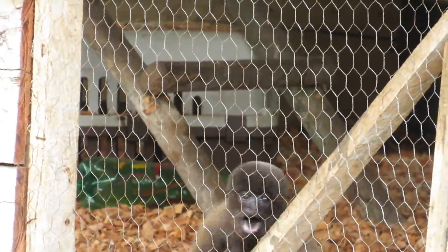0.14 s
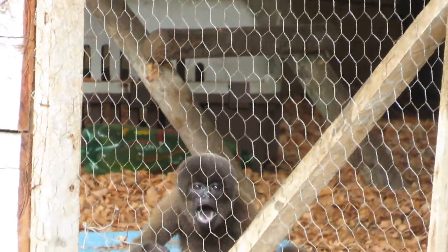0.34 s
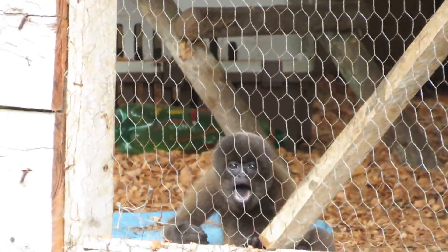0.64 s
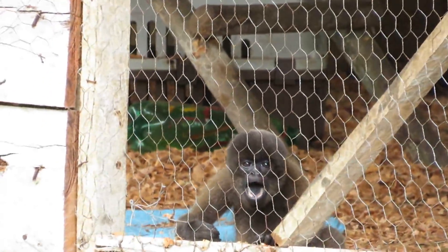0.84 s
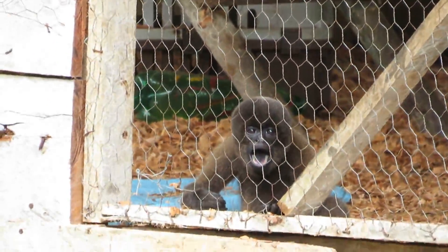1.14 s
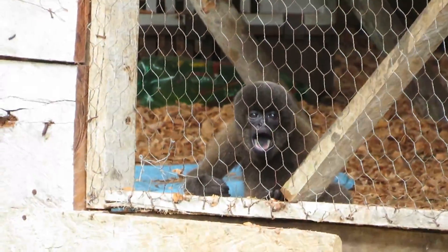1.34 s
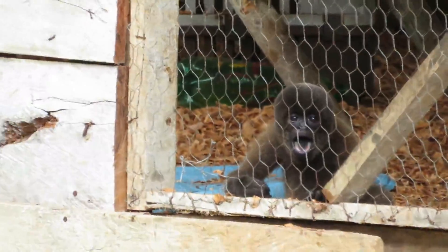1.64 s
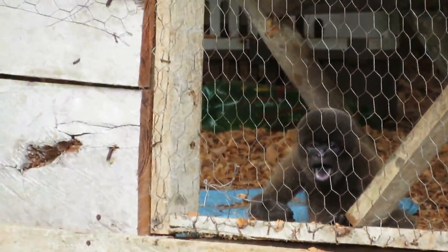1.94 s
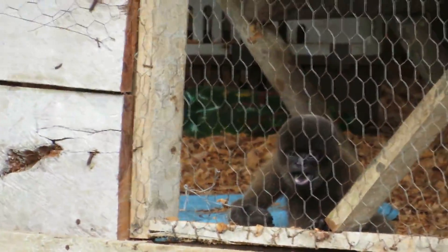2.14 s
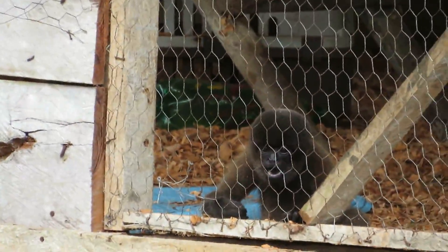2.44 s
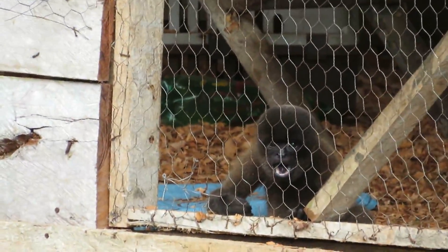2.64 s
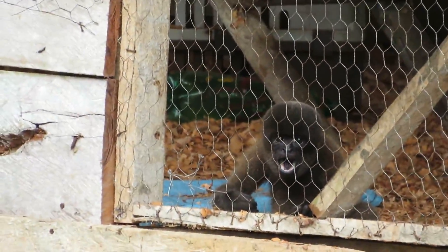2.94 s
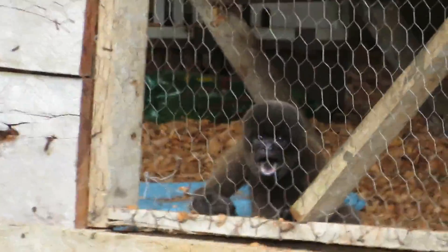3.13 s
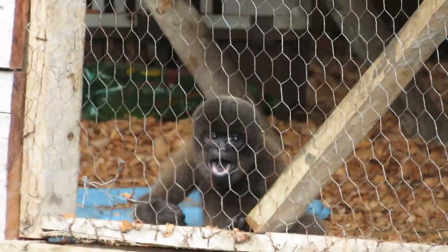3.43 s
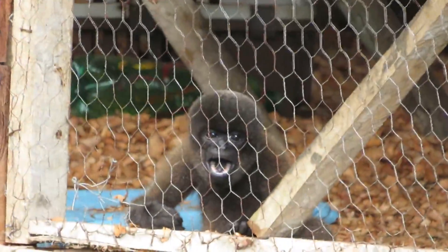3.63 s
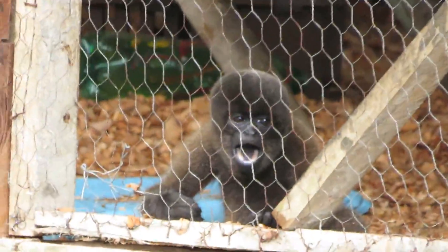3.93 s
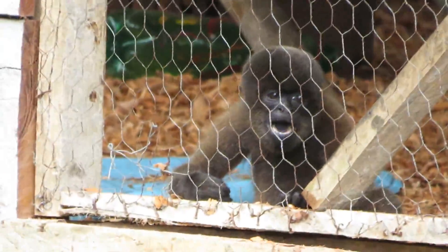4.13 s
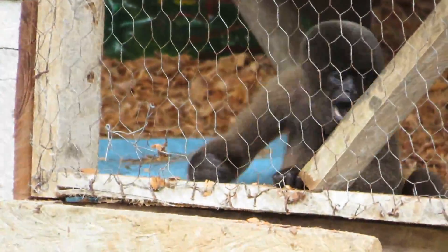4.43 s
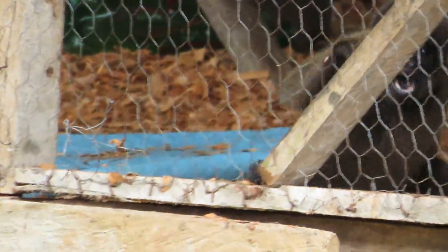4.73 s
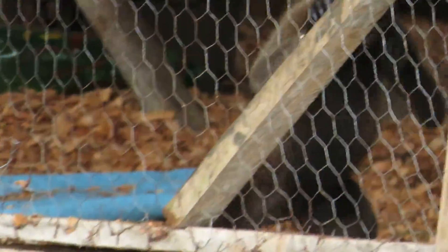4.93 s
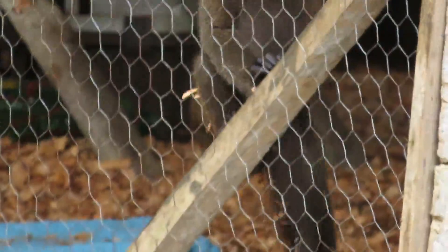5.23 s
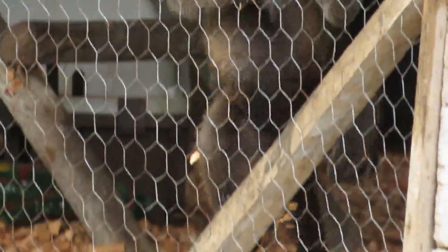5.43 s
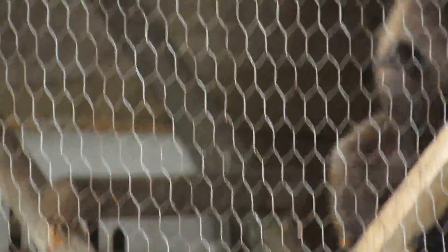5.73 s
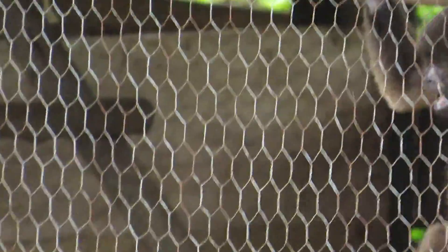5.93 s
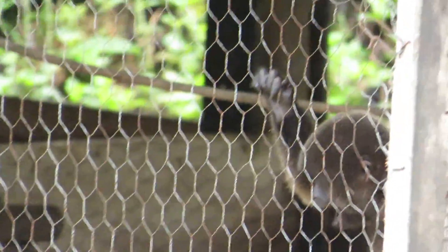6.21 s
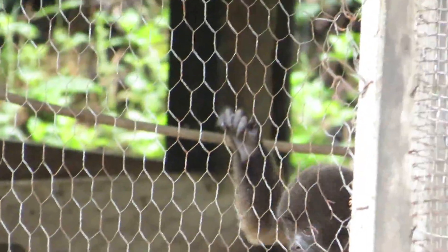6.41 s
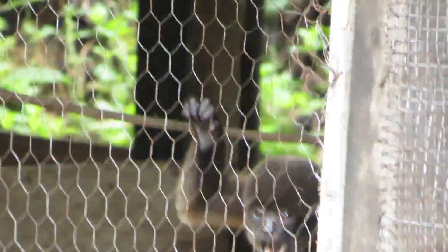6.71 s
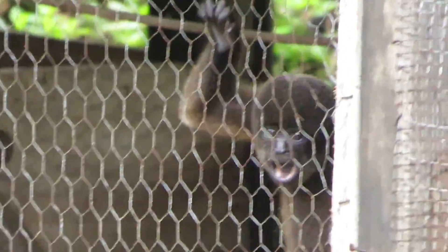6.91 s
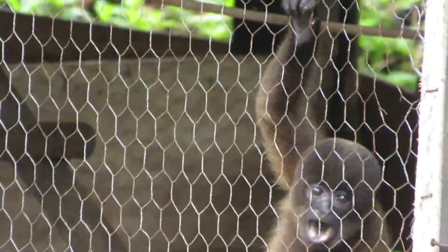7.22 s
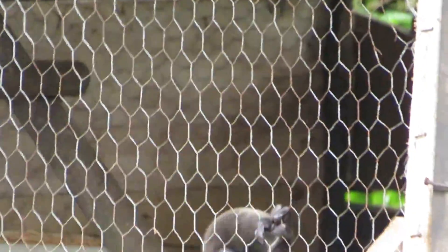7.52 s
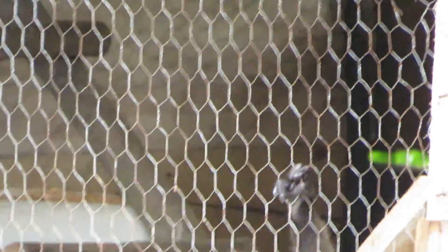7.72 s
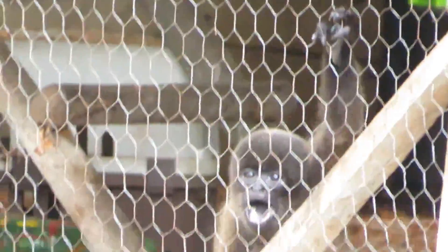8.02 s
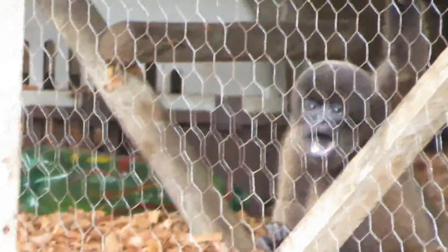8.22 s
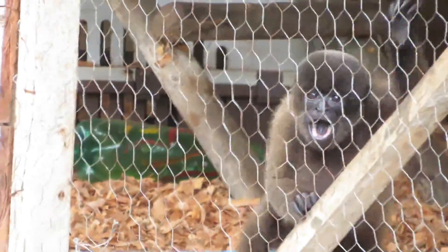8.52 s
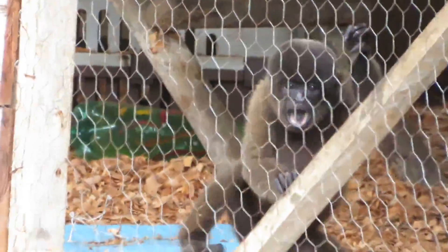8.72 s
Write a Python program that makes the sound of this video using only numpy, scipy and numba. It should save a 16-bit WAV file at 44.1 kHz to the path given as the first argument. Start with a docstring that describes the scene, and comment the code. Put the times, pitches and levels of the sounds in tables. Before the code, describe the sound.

Outdoors, a few metres from a wooden pen, a young monkey shrieks repeatedly in a high, raspy voice. The shrieks give way to brief barks and whistling chirps, then return, growing harsher toward the end. The calls echo lightly off the walls, with an occasional soft knock on wood. The background is very quiet: a murmur of air, far-off motor hum, insects and slight wind rumble on the microphone.

```python
"""Young monkey in a pen

Outdoors, a few metres from a wood and wire pen. The monkey's slack vocal folds clap out short throaty
barks, then tighten and flip up into a thin whistle; in the long screams the whistle breaks to half its
pitch and turns to rasp. The pen walls echo the calls and a few wooden knocks. Behind them are a murmur
of air, a distant motor and insects, with wind on the microphone."""
import sys
import numpy as np
from scipy import signal
from scipy.io import wavfile
from scipy.ndimage import uniform_filter1d
from numba import njit

SR = 44100
rng = np.random.default_rng(int(sys.argv[2]) if len(sys.argv) > 2 else 0)


def log_audio(samples):
    """Write samples as a 16-bit WAV file to the path given in sys.argv[1]."""
    # one column per channel
    frames = np.atleast_2d(samples).T
    # limit to full scale, then quantise
    limited = np.clip(frames, -1, 1)
    pcm = np.round(limited * 32767).astype(np.int16)
    wavfile.write(sys.argv[1], SR, pcm)


N = 390726
T = np.arange(N) / SR


def undb(db):
    return 10 ** (np.asarray(db) / 20)


def unit(x):
    return x / np.sqrt(np.mean(x ** 2))


def decay(t, t60):
    return np.exp(-np.log(1000) * t / t60)


def curves(rows):
    """Columns of a timed table as curves over the whole scene."""
    times, *columns = np.transpose(rows)
    return [np.interp(T, times, column) for column in columns]


@njit
def bandpass(x, hz, width_hz):
    """State-variable band-pass with a moving centre, gain 1 at the centre."""
    y, band_state, low_state = np.empty(len(x)), 0., 0.
    for i in range(len(x)):
        g, damping = np.tan(np.pi * hz[i] / SR), width_hz / hz[i]
        v = (band_state + g * (x[i] - low_state)) / (1 + g * (g + damping))
        band_state, low_state = 2 * v - band_state, low_state + 2 * g * v
        y[i] = damping * v
    return y


def band(x, hz, width_hz):
    """A steep resonance: the band-pass twice."""
    hz, width_hz = hz + np.zeros(len(x)), float(width_hz)
    return bandpass(bandpass(x, hz, width_hz), hz, width_hz)


def noise_band(hz, width_hz, size=N):
    return band(rng.standard_normal(size), hz, width_hz)


@njit
def uneven_cycles(hz, period_scale):
    """Phase in turns; every cycle has its own length."""
    turns, position = np.empty(len(hz)), 0.
    for i in range(len(hz)):
        position += hz[i] / period_scale[int(position)] / SR
        turns[i] = position
    return turns


def wander(rate, size=N):
    """Random levels held 1 / rate s and smoothed twice; spread near 1."""
    hold = int(SR / rate)
    steps = np.repeat(rng.standard_normal(size // hold + 1), hold)
    return 1.31 * uniform_filter1d(uniform_filter1d(steps, hold), hold)[:size]


def call_span(start, end, fade_s):
    """Sample range, time since the start and edge fade of one call."""
    span = slice(int(start * SR), min(int(end * SR), N))
    t = T[span] - start
    return span, t, np.clip(np.minimum(t, end - start - t) / fade_s, 0, 1)


# Colour of the open air. Each row: frequency in Hz, relative level per Hz in dB.
AIR_SPECTRUM = [(15, -34), (25, -9.5), (158, -3.5), (621, -11.5), (749, -20.5), (1000, -14), (2430, -18),
                (8100, -27.5), (11500, -40), (15000, -58)]
# Its slow swell. Each row: time in seconds, level around 600 Hz in dB.
AIR_SWELL = [(0, -58), (3.3, -58), (4.0, -60), (4.4, -58.5), (8.86, -57.5)]


def air():
    """Distant air all round: third-octave noise bands flicker separately, the bass near the centre."""
    out = np.zeros((2, N))
    spectrum_hz, spectrum_db = np.transpose(AIR_SPECTRUM)
    for hz in 30 * 2 ** np.arange(0, 9.1, 1 / 3):
        mid, side = (noise_band(hz, hz / 2.92) for _ in range(2))
        db = np.interp(np.log(hz), np.log(spectrum_hz), spectrum_db) + 1.34 * wander(3.14)
        spread = min(hz / 320, .8) * np.array([[1], [-1]])
        out += undb(db) * (mid + spread * side)
    midrange_rms = np.std(band(out.mean(axis=0), 632, 965))
    return out / midrange_rms * undb(curves(AIR_SWELL)[0])


# The motor's hum and its drone. Each row of both: time in seconds, level in dB.
HUM_LEVELS = [(0, -62), (1, -56), (2.5, -64.5), (5.6, -56.5), (8.86, -55)]
DRONE_LEVELS = [(0, -57), (3.2, -60), (3.5, -65.5), (4.2, -63.5), (4.4, -57), (8.0, -56), (8.3, -65)]


def motor(hum_hz=163, drone_hz=785):
    """A motor far from the microphone: a wavering tone, its octave and a breathy drone."""
    phase = 2 * np.pi * np.cumsum(hum_hz * (1 + 0.0202 * wander(7.3))) / SR
    hum = np.sin(phase) + undb(-4.5) * np.sin(2 * phase)
    drone = undb(curves(DRONE_LEVELS)[0] + wander(1.835)) * unit(noise_band(drone_hz, 174))
    return undb(curves(HUM_LEVELS)[0] + 2.86 * wander(25)) * hum + drone


# The insect chorus. Each row: centre in Hz, width in Hz, level in dB.
INSECT_BANDS = [(6700, 220, -73.5), (8300, 1400, -74)]


def insects():
    """Insects on both sides of the microphone: narrow, gently wavering bands of treble hiss."""
    out = np.zeros((2, N))
    for hz, width_hz, db in INSECT_BANDS:
        level = undb(db + 2 * wander(6.7))
        out += level * np.array([unit(noise_band(hz, width_hz)) for _ in range(2)])
    return out


# Gusts at the microphone. Each row: time in seconds, level in dB.
GUSTS = [(0, -64), (.25, -47.5), (.6, -62.5), (5.3, -59), (5.6, -58), (6.2, -59), (6.85, -57), (7.1, -58)]


def wind():
    """Wind right on the microphone: a low rumble."""
    return undb(curves(GUSTS)[0]) * unit(noise_band(50, 100))


# Barks from the pen. Each row: start in seconds, rough peak level in dB, low and middle throat
# resonances in Hz, top resonance relative to those two in dB, length in seconds.
THROAT_BARKS = [(0.132, -18.5, 1890, 2640, -5.5, 0.021), (0.938, -12, 2130, 2740, -9.5, 0.029),
                (1.747, -13, 2180, 2510, -4.5, 0.056), (2.676, -19.5, 1950, 2800, -6, 0.023),
                (3.1, -19, 2020, 2980, -9.5, 0.027), (3.7248, -21.5, 2030, 2910, -9, 0.024),
                (3.872, -22, 2416, 2452, -1, 0.023), (4.383, -18, 1830, 2710, -16, 0.029),
                (4.5266, -16, 1920, 2520, -3.5, 0.025), (4.9468, -18.5, 1690, 2780, -7.5, 0.034),
                (5.227, -13, 1800, 2640, -8, 0.025), (5.5743, -21.5, 1750, 2690, -18, 0.019),
                (5.9142, -16, 1620, 2660, -18, 0.03), (6.709, -25.5, 2080, 2670, -3, 0.043),
                (6.883, -17, 1796, 2560, -13, 0.03), (7.1993, -14, 1970, 2690, -6.5, 0.029),
                (8.0744, -13, 2010, 2680, -5, 0.038), (8.614, -16, 2140, 2717, -9.5, 0.015)]


def barks(clap_hz=430, clap_rise_hz=680, crest_db=13.5):
    """A few metres off, slack folds clap unevenly, faster and faster, into three throat resonances."""
    out = np.zeros(N)
    for start, peak_db, low_hz, mid_hz, top_db, length in THROAT_BARKS:
        progress = np.arange(int((length + 0.0025) * SR)) / (length * SR)
        jitter, shimmer = rng.standard_normal((60, 2)).T
        turns = uneven_cycles(clap_hz + clap_rise_hz * progress, np.exp(.12 * jitter))
        claps = np.diff(np.floor(turns), prepend=-1) * undb(2.4 * shimmer)[turns.astype(int)]
        breath = 0.039 * rng.standard_normal(len(progress))
        arch = (progress < 1) * (0.86 + 0.66 * np.sin(3.28 * progress))
        soft = band(band((claps + breath) * arch, 1500, 7300), 1500, 7300)  # flesh has no sharp edge
        throat = unit(band(soft, low_hz, 570) - band(soft, mid_hz, 530))
        throat += undb(top_db) * unit(band(soft, 3480, 1500))
        first = int(start * SR)
        out[first:first + len(throat)] += undb(peak_db - crest_db) * unit(throat)
    return out


# Clean whistles from the pen. Each row: start and length in seconds, entry, held and exit pitch in Hz,
# on-pitch level at the start and at the end in dB.
THIN_WHISTLES = [ (0.141, .075, 4300, 5720, 5700, -39.5, -44), (0.22, 0.04, 5690, 5650, 6050, -45.5, -28),
                 (0.742, 0.024, 5820, 5800, 4970, -44, -20.5),
                 (1.011, 0.055, 5450, 5500, 5650, -37.5, -29.5),
                 (1.156, 0.07, 5980, 5834, 5797, -30.5, -17), (1.781, 0.0997, 4000, 5060, 5380, -27.5, -21),
                 (2.693, 0.012, 2740, 3100, 3120, -23, -41), (3.115, 0.018, 2960, 4220, 4340, -32, -33.5),
                 (3.319, 0.091, 5660, 5750, 4790, -24.5, -25.5), (3.895, 0.014, 4870, 5150, 5230, -37, -23),
                 (3.967, 0.02, 5440, 5500, 5090, -41, -30), (4.535, 0.022, 3390, 4930, 4890, -38, -26),
                 (4.626, 0.031, 3680, 3618, 3560, -44, -23.5), (4.659, 0.037, 3820, 5340, 4970, -22, -34.5),
                 (4.963, 0.02, 3550, 4480, 4300, -32, -39.5), (5.25, .015, 4240, 4270, 4314, -24.5, -27.5),
                 (6.025, 0.13, 2105, 5420, 5570, -37, -40.5), (6.44, 0.021, 5880, 5800, 4490, -25, -20.5),
                 (6.717, 0.033, 1454, 4220, 4215, -11.5, -37.5),
                 (6.903, .022, 4170, 5100, 5170, -36.5, -34),
                 (7.017, 0.049, 4280, 3540, 3540, -39.5, -30.5), (7.231, 0.02, 4550, 5060, 4960, -22, -41),
                 (7.281, 0.043, 5200, 5115, 4430, -38.5, -31), (7.318, 0.032, 4440, 4450, 4300, -35, -28),
                 (7.355, .055, 4770, 5270, 5680, -25, -36), (7.558, .05, 6050, 5900, 6000, -33, -47),
                 (7.901, .022, 4170, 3980, 3780, -32, -22.5), (8.088, 0.056, 2825, 4570, 4460, -26, -22),
                 (8.127, 0.012, 1700, 1560, 1530, -25, -24.5), (8.153, 0.033, 4440, 4380, 4590, -35, -27),
                 (8.612, 0.042, 1904, 4200, 4300, -21.5, -33),
                 (8.683, 0.03, 3670, 3200, 3170, -27.5, -23.5)]
RISE_HZ_PER_S, FALL_HZ_PER_S, DROP_HZ_PER_S = 85000, 40000, 65000  # folds tighten, slacken, let go
OFF_PITCH_DB_PER_OCTAVE = -16.5  # weaker while gliding to or from the held pitch


def whistles():
    """Taut folds swing as a near sine with a faint octave; they glide in, hold, then creep up or drop."""
    out = np.zeros(N)
    for start, length, entry_hz, held_hz, exit_hz, start_db, end_db in THIN_WHISTLES:
        span, t, fade = call_span(start, start + length, fade_s=0.0018)
        glide = np.clip(held_hz, entry_hz - FALL_HZ_PER_S * t, entry_hz + RISE_HZ_PER_S * t)
        glide -= np.maximum(held_hz - exit_hz - DROP_HZ_PER_S * (length - t), 0)
        creep = max(exit_hz - held_hz, 0) * t / length
        hz = uniform_filter1d(glide + creep, SR // 120, mode="nearest")  # folds cannot turn a corner
        phase = 2 * np.pi * np.cumsum(hz * (1 + 0.0059 * wander(268, len(t)))) / SR
        tone = np.sqrt(2) * (np.sin(phase) + undb(-33.5) * np.sin(2 * phase))
        db = start_db + (end_db - start_db) * t / length
        db += OFF_PITCH_DB_PER_OCTAVE * np.abs(np.log2(glide / held_hz))
        out[span] += tone * undb(db + 2.8 * wander(140, len(t))) * fade
    return out


def rasp(hz, throat_hz, throat_db, mouth_hz=2840):
    """Folds stumble in cycle length and size; their puffs ring in low, upper, treble and top bands."""
    n = len(hz)
    jitter, shimmer = rng.standard_normal((n // 4 + 9, 2)).T
    turns = uneven_cycles(hz, np.exp(.42 * jitter))
    strength = undb(1.9 * shimmer)[turns.astype(int)] * undb(1.2 * wander(202, n))
    puffs = strength * np.exp(4 * np.cos(2 * np.pi * turns))
    throat = band(puffs, throat_hz * (1 + 0.035 * wander(26.2, n)), 530)  # the throat keeps shifting
    low = undb(throat_db) * unit(throat) + unit(band(band(puffs, hz, 1770), 1.005 * hz, 1660))
    mouth = mouth_hz + 0.68 * (hz - mouth_hz)  # the mouth follows the pitch only in part
    upper = undb(-5.5) * unit(band(band(puffs, 1.713 * mouth, 910), 1.64 * mouth, 910))
    upper += unit(band(band(puffs, 1.806 * mouth, 1080), 2.041 * mouth, 1100))
    treble = unit(band(puffs, 2.91 * hz, 4200))
    treble += undb(-11.5) * unit(band(band(puffs, 3.6 * hz, 3500), 4.1 * hz, 3500))
    top = band(band(puffs, 13500, 3000), 14000, 3000)
    return unit(low), unit(upper), treble, unit(top)


# Screams from the pen, one list each. Each row: time in seconds, half pitch in Hz, low band level in dB.
SCREAM_CONTOURS = [
    [(.263, 2950, -30.5), (.4, 2984, -26), (.55, 3060, -24.5), (.63, 2968, -22), (.7, 2862, -24),
     (.745, 2900, -21.5), (.775, 2470, -42)],
    [(.965, 2505, -22), (.985, 2818, -17.5), (1.015, 2770, -26), (1.072, 2763, -20), (1.1, 2927, -25.5),
     (1.16, 2934, -23.5), (1.23, 2920, -24), (1.4, 2999, -24.5), (1.47, 2853, -24), (1.53, 2455, -25),
     (1.59, 2328, -42)],
    [(1.88, 2498, -22.5), (1.97, 2896, -24.5), (2.0, 2725, -24.5), (2.04, 2746, -23.5), (2.08, 2656, -26),
     (2.11, 2240, -33), (2.15, 2008, -41.5)],
    [(6.145, 2800, -29.5), (6.2, 2810, -26.5), (6.35, 2837, -26), (6.44, 2966, -29)],
    [(7.343, 2215, -36), (7.355, 2526, -19.5), (7.37, 2440, -53), (7.405, 2360, -38), (7.412, 2924, -22),
     (7.555, 2988, -25), (7.595, 2970, -29), (7.61, 3004, -20.5), (7.7, 2788, -19.5), (7.78, 2730, -18),
     (7.82, 2542, -16.5), (7.9, 2162, -22.5)],
    [(8.175, 2617, -29), (8.275, 2570, -31.5), (8.285, 2807, -19.5), (8.36, 3094, -24), (8.42, 2707, -22),
     (8.462, 2810, -28)],
    [(8.716, 2656, -21.5), (8.76, 3100, -30.5), (8.81, 3323, -31), (8.86, 3420, -24)],
]
# Their steady stretches. Each row: start and end in seconds, upper band over the low one at the start
# and at the end in dB, throat resonance in Hz, its gain in dB, treble gain at full effort in dB.
SCREAM_STRETCHES = [ (0.262, 0.71, 0, 0.5, 2480, 5, -18.5), (.705, 0.773, -8, 6, 2400, -1, -24),
                    (0.961, 1.01, -12, -15, 2184, 2, -10.5), (1.072, 1.162, -3.5, -3.5, 2530, -5, -23),
                    (1.229, 1.53, 0.5, 0, 2496, 4, -23), (1.53, 1.593, 3.5, 13.5, 2100, -13, -24),
                    (1.88, 2.105, -2, 3.5, 2570, 6, -23.5), (2.107, 2.149, 8, 17, 1900, -24, -16),
                    (6.146, 6.443, -7.5, -3.5, 2680, 10, -25), (7.341, 7.411, -25, -16, 1940, -22, -34),
                    (7.414, 7.558, -4, -5, 2720, 6, -21.5), (7.551, 7.608, -1, -1.5, 2320, -16, -16),
                    (7.606, 7.901, -8.5, -6, 2600, 2.5, -17.5), (8.174, 8.281, -16, -16, 2190, -0.5, -10),
                    (8.283, 8.455, -32, -31.5, 2130, -3.5, -6), (8.714, 8.866, -29, -32, 2040, -6, -8)]
# One value a stretch: the share that is rasp rather than clean tone, from 0 to 1.
RASP_SHARES = [.85, .45, .08, .22, .44, .12, .22, .7, .76, .15, .38, .12, .48, .97, .9, .92]


def screams():
    """Every second swing of the folds is weak, so a tone sounds at half pitch, mixed with rasp."""
    out = np.zeros(N)
    pitch_hz, level_db = curves(np.concatenate(SCREAM_CONTOURS))
    for stretch, rasp_share in zip(SCREAM_STRETCHES, RASP_SHARES):
        start, end, start_db, end_db, throat_hz, throat_db, treble_db = stretch
        span, t, fade = call_span(start, end, fade_s=0.00083)
        hz = uniform_filter1d(pitch_hz[span], SR // 60, mode="nearest")
        waver = 1 + 0.00815 * wander(150.1, len(t)) + 0.01211 * wander(40, len(t))
        phase = 2 * np.pi * np.cumsum(hz * waver) / SR
        low_db = level_db[span]
        upper_db = start_db + (end_db - start_db) * t / (end - start)
        low_rasp, upper_rasp, treble, top = rasp(hz, throat_hz, throat_db)
        # the treble swells faster than the voice
        effort_db = 0.21 * (low_db + upper_db - np.max(low_db + upper_db))
        upper_rasp += undb(treble_db + effort_db) * treble + undb(-43 + 3.5 * effort_db) * top
        tone_share = 1 - rasp_share
        tone_gain = np.sqrt(2 * tone_share) * undb(2.45 * wander(93.5, len(t)))
        low = tone_gain * np.sin(phase) + np.sqrt(rasp_share) * low_rasp
        overtones = undb(-28.5) * np.sin(3 * phase) + undb(-29) * np.sin(4 * phase)
        # the upper tone wavers twice as far, so rasp buries it first
        upper_tone = tone_share * (np.sin(2 * phase) + tone_share ** 2 * overtones)
        upper = tone_gain * upper_tone + np.sqrt(rasp_share) * upper_rasp
        out[span] += undb(low_db) * (low + undb(upper_db) * upper) * fade
    return out


# A faint hiss from the pen. Each row: time in seconds, level in dB.
HISS_LEVELS = [(3.14, -60), (3.21, -51), (3.31, -51), (3.34, -65)]


def hiss():
    """One brief, hoarse band of noise that barely reaches the microphone."""
    sounding = (T > HISS_LEVELS[0][0]) * (T < HISS_LEVELS[-1][0])
    return undb(curves(HISS_LEVELS)[0]) * sounding * unit(noise_band(4110, 450))


# Knocks in the pen. Each row: start in seconds, strength of the blow in dB.
WOOD_KNOCKS = [(3.155, -42), (3.193, -46.5), (3.917, -45), (7.01, -47.5), (8.123, -36)]
# Modes of the wood. Each row: typical frequency in Hz, gain in dB, seconds to fall by 60 dB.
WOOD_MODES = [(352, 3, 0.056), (489, 11, 0.025), (712, 8.5, 0.038), (1110, 6, 0.064)]


def knocks():
    """A hand or foot strikes wood a few metres off; each blow rings at slightly different pitches."""
    out, t = np.zeros(N), T[:SR // 8]
    push = 1 - np.exp(-t / 0.0012)
    for start, db in WOOD_KNOCKS:
        first = int(start * SR)
        for mode_hz, mode_db, t60 in WOOD_MODES:
            hz = mode_hz * (1 + 0.19 * rng.standard_normal())
            ring = np.sin(2 * np.pi * hz * t) * decay(t, t60)
            out[first:first + len(t)] += undb(db + mode_db) * push * ring
    return out


# The slap off the pen wall. Each row: delay in seconds, level against the direct sound in dB.
WALL_SLAPS = [(.024, -8.5)]


def pen(direct, mid_db=-8.5, side_db=-18.5):
    """The pen from outside: a blurred wall slap and a diffuse tail, different on the left and right."""
    t = T[:int(.9 * SR)]
    tails = []
    for db in (mid_db, side_db):
        white = rng.standard_normal(len(t))
        dull = band(band(white, 2300, 4200), 2300, 4200)
        early = dull * decay(t, t60=0.5) + (white - dull) * decay(t, t60=0.36)  # treble dies sooner
        late = undb(-19.5) * white * decay(t, t60=1.1)
        tail = (early + late) * np.clip(t / 0.006, 0, 1)
        tails.append(undb(db) * tail / np.linalg.norm(tail))
    for delay, db in WALL_SLAPS:
        for tail, share_db in zip(tails, (0, -8)):
            slap = rng.standard_normal(len(t)) * np.exp(-((t - delay) / 0.0036) ** 2)
            tail += undb(db + share_db) * slap / np.linalg.norm(slap)
    mid, side = tails
    mid[0] = 1  # the straight path to the microphone
    # above 8 kHz the voice reaches the two sides unalike
    side += undb(-26) * band(noise_band(11000, 6000, len(t)), 11000, 6000) * np.exp(-t / .01)
    return np.array([signal.fftconvolve(direct, mid + sign * side)[:N] for sign in (1, -1)])


def scene():
    """The pen a few metres off, the open air beyond it and wind on the microphone."""
    hoarse_hiss, rumble = hiss(), wind()
    inside_pen = whistles() + screams() + barks() + knocks() + hoarse_hiss
    return pen(inside_pen) + air() + motor() + insects() + rumble


def record(dry, top_hz=15500):
    """The camera's microphone channel cuts the top steeply."""
    return signal.sosfilt(signal.ellip(8, .2, 70, top_hz, fs=SR, output="sos"), dry)


dry = scene()
out = record(dry)
log_audio(out)
```